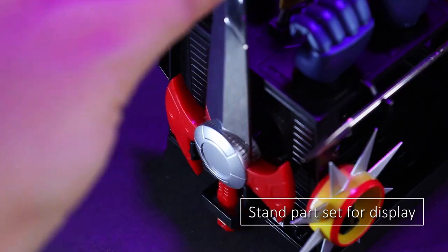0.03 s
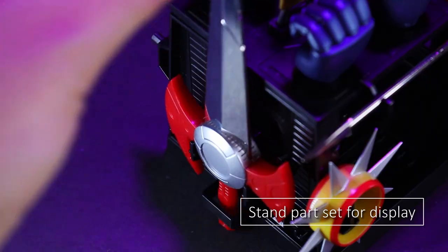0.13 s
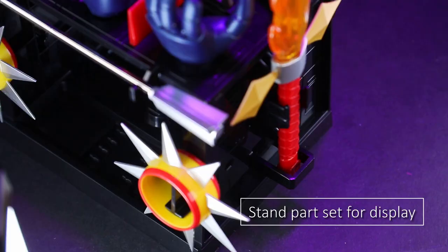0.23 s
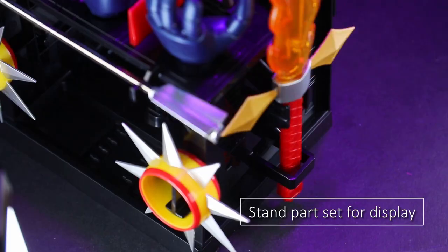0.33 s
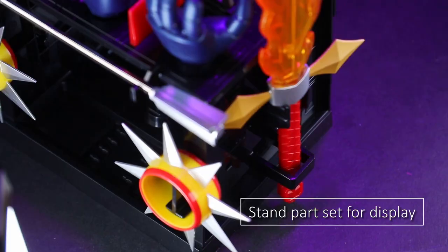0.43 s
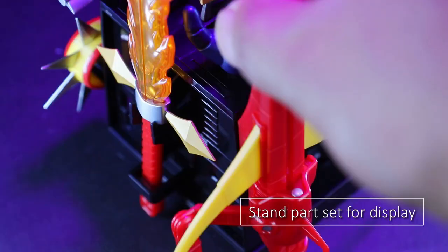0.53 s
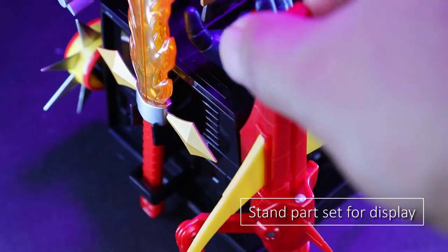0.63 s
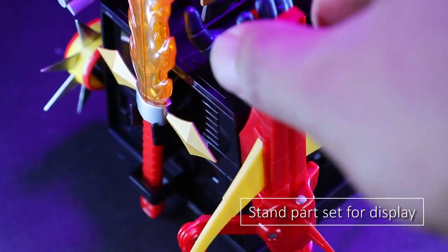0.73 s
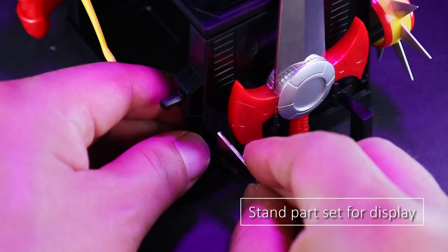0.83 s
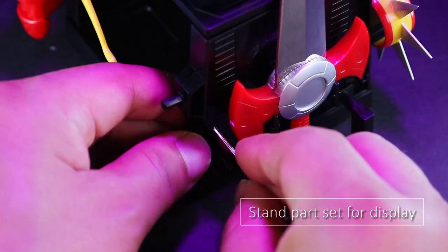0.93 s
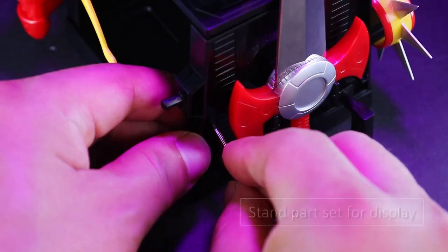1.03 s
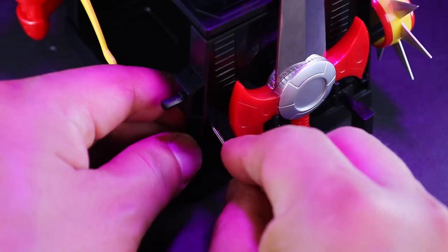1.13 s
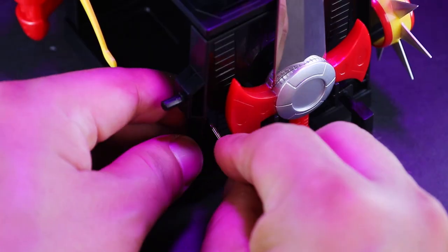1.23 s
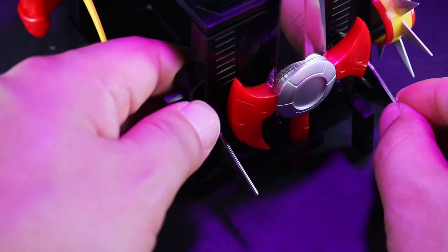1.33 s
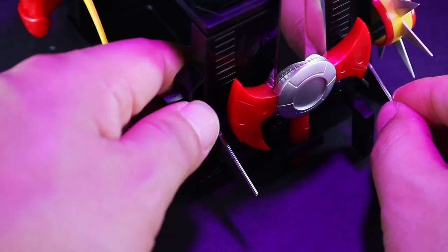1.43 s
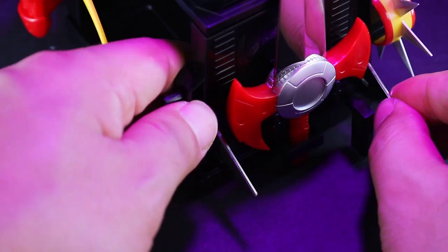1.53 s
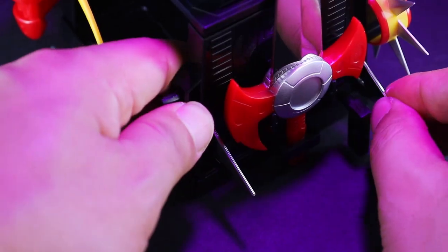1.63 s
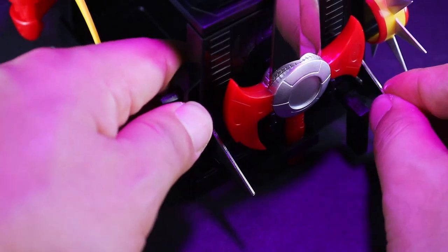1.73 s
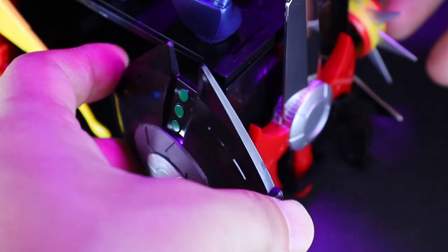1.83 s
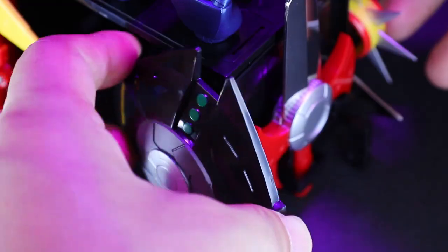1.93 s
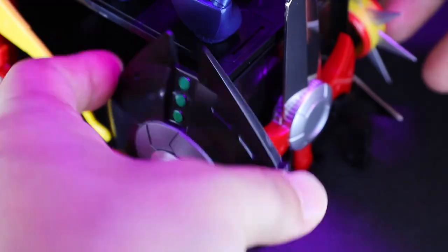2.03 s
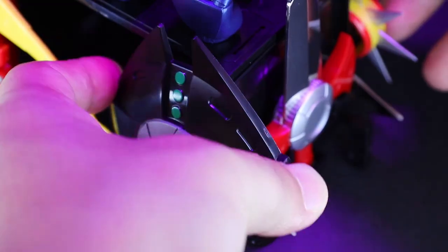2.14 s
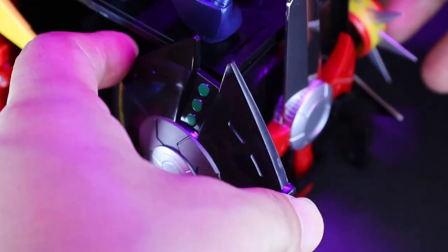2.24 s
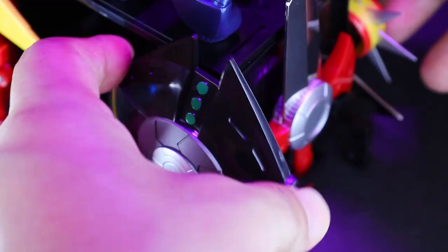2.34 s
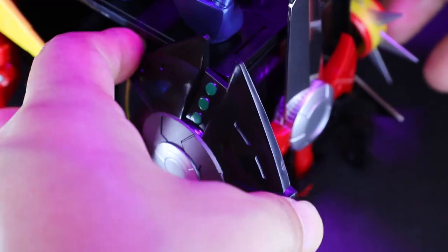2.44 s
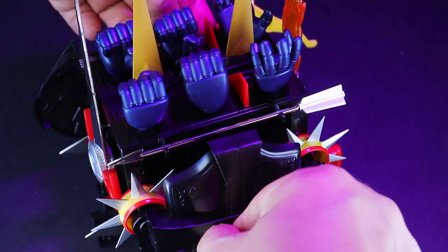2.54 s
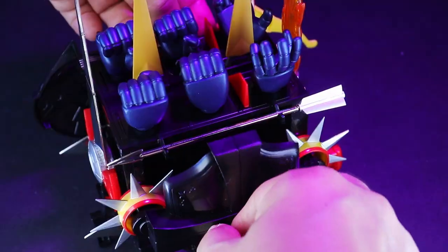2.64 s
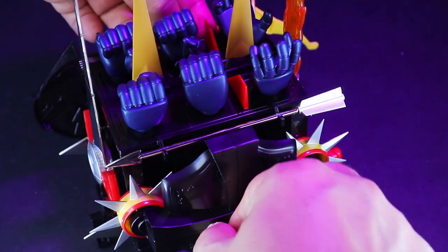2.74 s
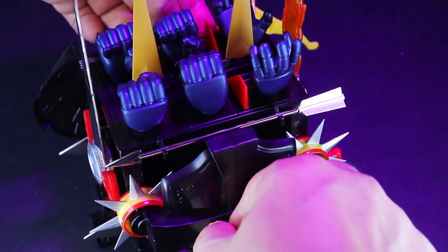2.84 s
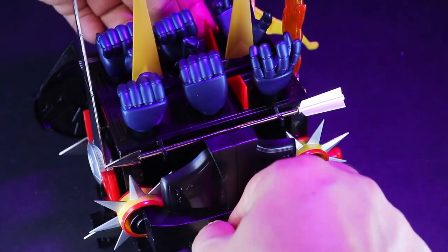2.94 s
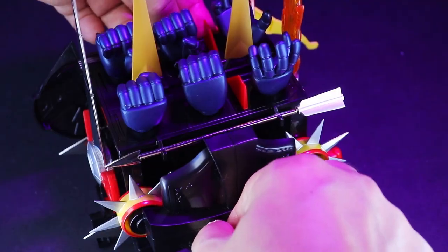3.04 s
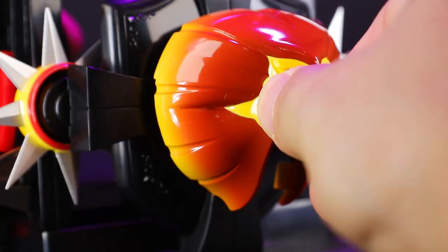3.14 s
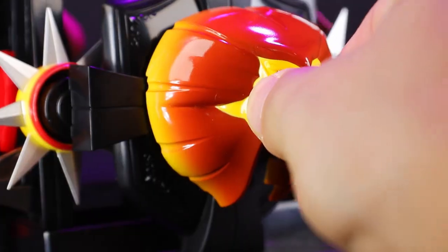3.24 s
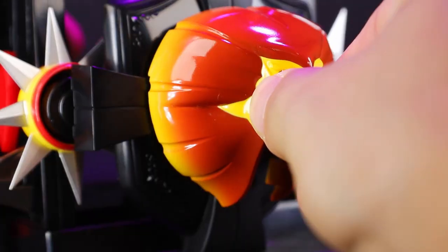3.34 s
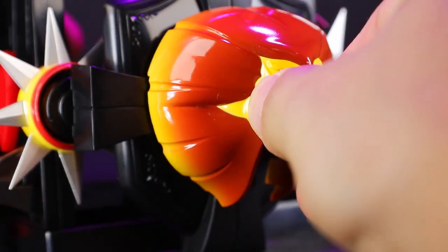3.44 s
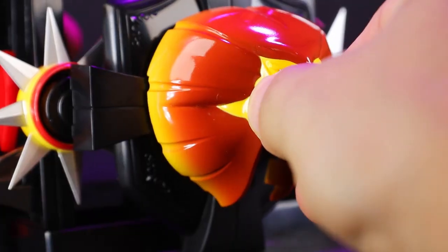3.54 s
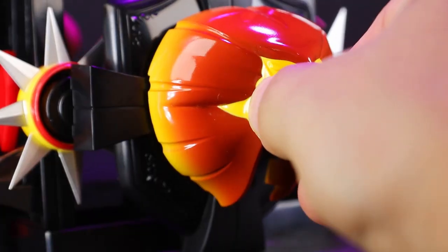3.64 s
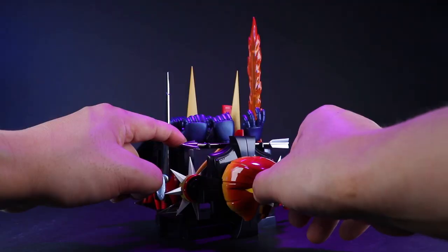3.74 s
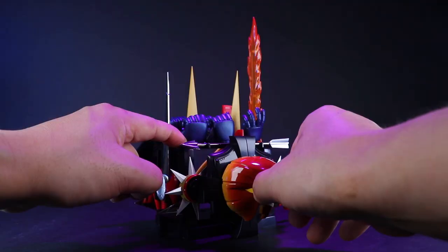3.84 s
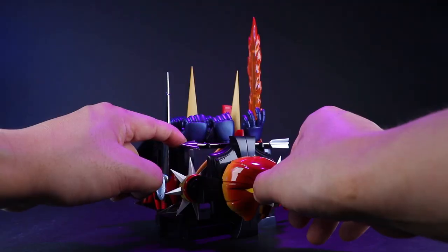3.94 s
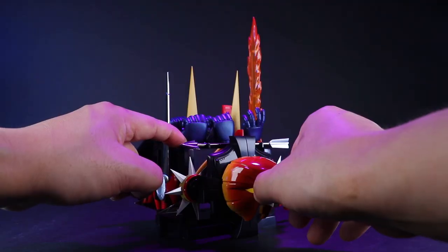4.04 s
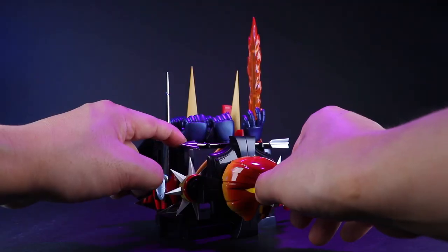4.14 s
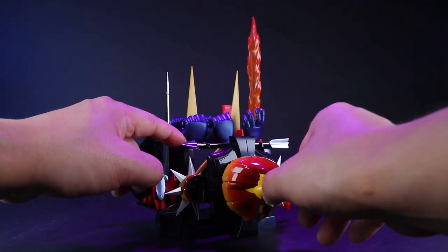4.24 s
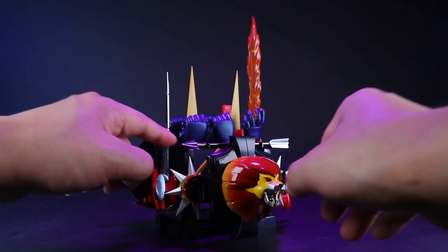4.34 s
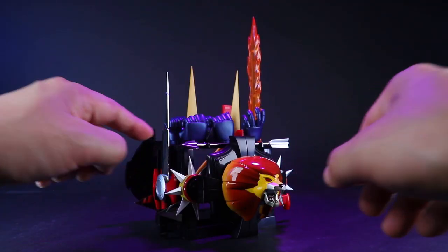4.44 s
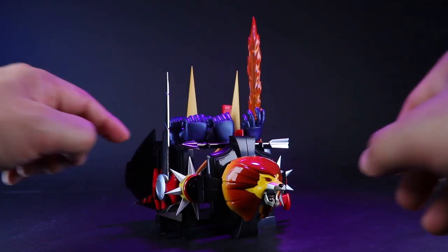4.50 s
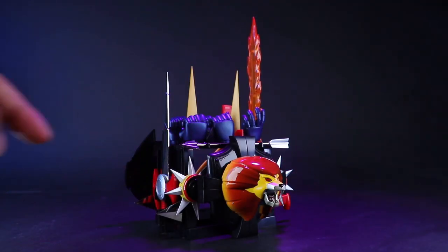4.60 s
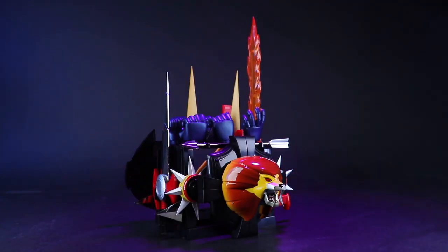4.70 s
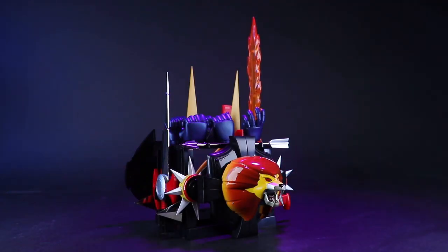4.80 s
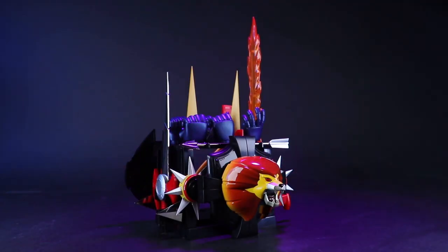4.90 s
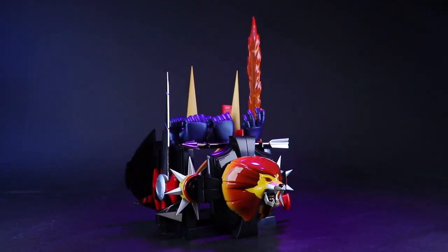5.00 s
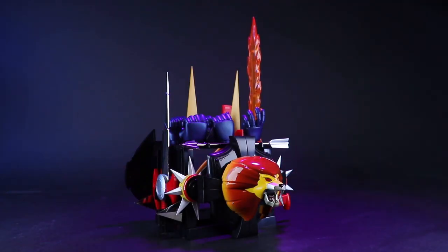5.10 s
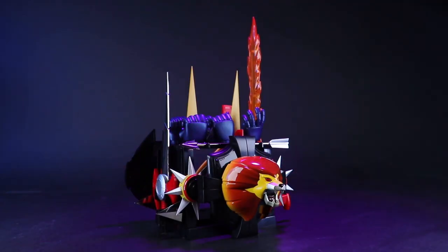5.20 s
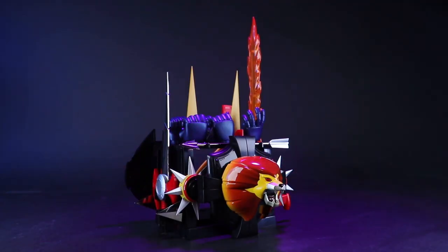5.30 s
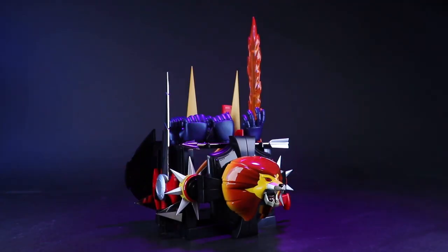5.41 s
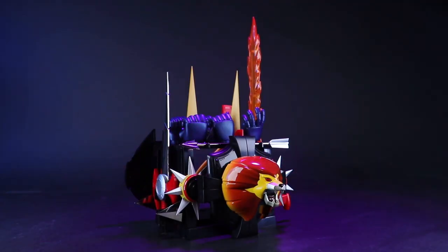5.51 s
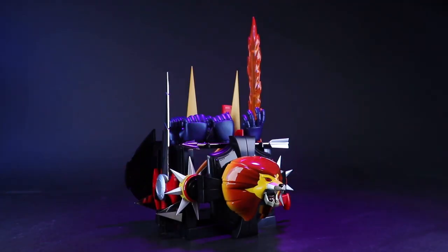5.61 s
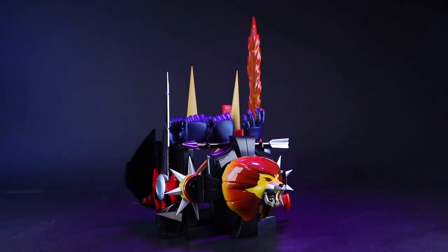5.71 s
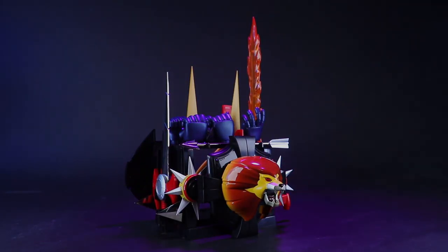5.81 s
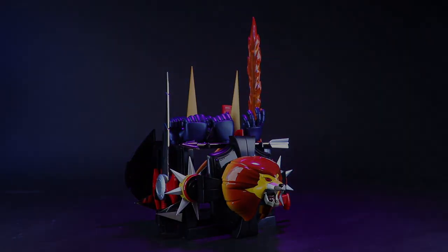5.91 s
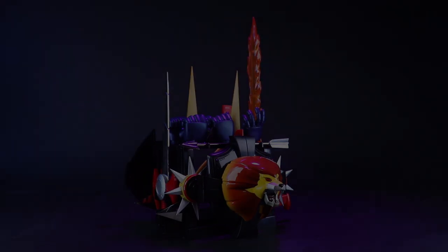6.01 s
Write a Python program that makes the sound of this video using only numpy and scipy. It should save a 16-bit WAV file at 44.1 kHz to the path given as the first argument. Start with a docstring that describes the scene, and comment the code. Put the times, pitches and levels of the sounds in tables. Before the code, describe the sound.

Small plastic toy parts click, scrape and snap onto a hollow stand close by, with one brief metallic ping near the end.

```python
"""Toy parts snapped onto a display stand

Small room, microphone close to a hollow plastic stand as plastic and metal parts are pressed onto it.
Pegs scrape, tick and snap home; each part rings briefly at its own pitch and shakes the stand.
The hardest snaps overload the microphone. Behind it all lie room tone and a thin electrical whine."""
import sys
import numpy as np
from scipy import signal
from scipy.fft import rfft, irfft
from scipy.io import wavfile

SR = 44100
rng = np.random.default_rng(int(sys.argv[2]) if len(sys.argv) > 2 else 0)


def wav_record(signal):
    """Record a signal, one row per channel, as 16-bit PCM in the file named by sys.argv[1]."""
    frames = np.transpose(np.atleast_2d(signal))
    bounded = np.clip(frames, -1, 1)
    # unit amplitude maps onto the largest positive 16-bit level
    quanta = np.round(bounded * 32767).astype(np.int16)
    wavfile.write(sys.argv[1], SR, quanta)


N = 267231

# pegs that catch, then seat: t/s, level/dB, treble/dB, seating delay/s, seating re catch/dB, part
PEG_SNAPS = [ (.094, -45, -16, .008, 7.5, "sword"), (.402, -17, 0.5, 0.0058, 4.5, "sword"),
             (.463, -25, -1.5, .007, 4, "sword"), (.788, -25.5, -4.5, .005, -13.5, "blade"),
             (1.333, -34.5, -7, .010, -6.5, "rod"), (1.940, -35.5, -14, 0.0096, -16, "shield"),
             (3.109, -19, -3.5, .002, -7.5, "armour"), (3.308, -7, -2.5, 0.0068, -3.5, "helmet"),
             (3.566, -44.5, 2.5, .008, 6, "helmet")]
# parts knocking against the stand: t/s, level/dB, treble/dB, part
PART_KNOCKS = [ (.000, -37.5, -34, "sword"), (0.37, -36, -19, "sword"), (1.299, -39.5, -15, "rod"),
               (2.752, -40.5, 1.5, "armour"), (2.816, -42, 2, "armour"), (2.846, -32, -7, "armour"),
               (2.887, -33, -17, "armour"), (3.014, -38, -1.5, "armour"), (3.044, -42, -16, "armour"),
               (3.225, -30, -3.5, "armour"), (3.456, -36, -11, "helmet"), (3.575, -36, -5, "spike"),
               (3.720, -50, -32, "helmet")]
# the shield's joint turning notch by notch: t/s, level/dB
JOINT_NOTCHES = [(2.007, -42), (2.072, -42.5), (2.124, -41.5), (2.263, -40.5), (2.309, -46)]
# small hard edges touching: t/s, level/dB, treble/dB, ring f/Hz, crack t60/s
EDGE_TICKS = [(0.294, -45.5, -14, 2250, .028), (0.945, -47, -5, 1140, 0.033),
              (1.116, -43, -12, 1060, 0.027), (1.64, -44, -1, 4570, 0.024), (3.605, -43, -3, 1190, 0.021),
              (4.276, -51, -5, 1870, 0.036), (4.399, -57.5, 7, 1010, .04), (5.187, -39.5, 3, 3280, .18),
              (5.764, -71.5, 18, 9000, 0.028), (5.915, -63, 15.5, 6060, 0.032),
              (5.972, -49.5, -1.5, 3650, 0.0073)]
# parts sliding and fingers rubbing: t/s, length/s, level/dB, bass/dB, treble/dB
SURFACE_RUBS = [(0.729, 0.038, -40, -7.5, -4), (1.69, 0.049, -48.5, 2.5, -35),
                (2.142, 0.083, -61.5, -3, -0.5), (2.621, 0.065, -44.5, 0.5, -11.5),
                (2.748, 0.037, -35.5, -2, -8), (2.772, 0.17, -40.5, 3.5, -28),
                (2.991, 0.073, -47, 8, -32.5), (3.233, 0.29, -46, -0.5, -5),
                (3.389, 0.057, -31, -13.5, -10), (3.452, 0.049, -33, -1.5, -16)]
# modes, by part: f/Hz, level re crack/dB, t60/s
PART_MODES = { "sword": [(582, -6, 0.067), (764.5, -2, .09), (856, -5, 0.018), (1621, -9, 0.11),
              (6280, -5, 0.0058), (8220, -2, .09), (8830, -11, 0.11)], "blade": [(918, 12.5, 0.02),
              (1000, -6, 0.022), (2894, -11, .07), (3700, -13, .03)], "rod": [(1040, 5, 0.02),
              (1258, 8, 0.025), (1323, 5, 0.066), (1523, -4, 0.013)], "shield": [(637.4, -2.5, 0.016),
              (915, 1.5, 0.02), (1460, -9, 0.02), (2460, -12, .04)], "armour": [(1243, 0.5, 0.022),
              (1740, -12.5, .04), (3580, -13, .05)], "helmet": [(1254, 0, .025), (1420, -4, 0.03),
              (1677, -3.5, 0.035), (1825, -9.5, .018), (2778, -13, 0.024)], "spike": [(8680, -3, .22),
              (5950, -1, 0.012)]}
# crack of a firm contact, by part: bass/dB, t60/s
PART_CRACKS = {"sword": (-2.5, 0.048), "blade": (-0.53, 0.034), "rod": (-6, 0.02), "shield": (-9, .022),
               "armour": (-4.5, .026), "helmet": (-5, 0.039), "spike": (-10, 0.035)}
# colour of a plastic contact: f/Hz, spectral density/dB
PLASTIC_SPECTRUM = [(60, -10.5), (150, -4), (260, -5.5), (420, 8.5), (700, -1), (1200, -3.5), (2000, -7.5),
                    (3600, -2.5), (5000, -10.5), (7000, -4), (9000, -7), (12000, -13), (15500, -23.5)]
# modes of the stand and the parts on it: f/Hz, gain/dB, t60/s
STAND_MODES = [(394, 8, .17), (425, 3, .15), (496, 3, .2), (566, 2, .16), (748, 1, .14), (900, -4, .07),
               (1230, -3, .09), (1661, -5, .1), (2515, -2, .05), (2820, -4, .05), (3700, 0, .05),
               (8220, -7, .07), (8870, -8, .07)]
# the stand nudged against the table: t/s, length/s, level/dB, centre f/Hz
TABLE_BUMPS = [(2.328, 0.037, -50.5, 255), (2.618, 0.13, -50.5, 280), (3.305, 0.023, -34.5, 58),
               (3.362, 0.2, -47.5, 224), (3.821, 0.067, -45, 171), (3.901, 0.17, -58, 202),
               (4.182, 0.16, -48, 134), (4.697, .07, -58.5, 221.6), (5.186, 0.041, -51, 260)]
# reverberation of the small room: f/Hz, t60/s, level/dB
ROOM_DECAY = [(100, 0.61, -6), (398, 0.23, -6), (1200, 0.24, -7), (3500, 0.29, -8.5), (7860, 0.2, -6),
              (14000, .16, -9)]
# room tone: f/Hz, relative spectral density/dB
ROOM_TONE_SPECTRUM = [(15, -34), (30, -1), (90, -7), (170, -4.5), (300, -4.5), (570, -6.5), (660, -12.5),
                      (800, -11.5), (1400, -13), (2100, -18.5), (4800, -25.5), (8800, -21.5), (13000, -26),
                      (15500, -34.5)]
# level of the electrical whine over time: t/s, level before its gain/dB
WHINE_LEVELS = [(0.0, -62), (0.52, -59), (0.84, -61), (1.2, -57.5), (2.05, -65), (2.46, -57), (2.59, -70.5),
                (3.3, -67), (6.05, -59)]

EDGES = np.concatenate([[50, 170], np.geomspace(330, 17000, 15)])  # noise band edges, f/Hz
CENTRES = np.sqrt(EDGES[1:] * EDGES[:-1])
BANDS = [signal.butter(2, pair, "bandpass", fs=SR, output="sos") for pair in zip(EDGES[:-1], EDGES[1:])]
T = np.arange(SR // 3) / SR  # time within one short sound, t/s


def snaps(hard_db=-18.5, seat_treble_db=-7, rattle_db=-15):
    """A peg catches, then seats with a duller click; after a hard snap the loose parts rattle."""
    out = np.zeros(N)
    for s, db, treble_db, lag, seat_db, part in PEG_SNAPS:
        add(out, s, contact(part, db, treble_db))
        add(out, s + lag, contact(part, db + seat_db, treble_db + seat_treble_db))
        if db > hard_db:
            rattle = chatter(.07, db + seat_db + rattle_db, bass_db=-7, treble_db=-5.5, fall_db=8)
            add(out, s + lag, rattle)
    return out


def contact(part, db, treble_db, firm_db=-31, bass_per_db=-0.2758):
    """A crack, a shove to the stand and the part's own short ring; a softer contact has more bass."""
    bass_db, crack_t60 = PART_CRACKS[part]
    bass_db += bass_per_db * (db - firm_db)
    tilt = [(1500, 0), (6000, treble_db)]  # f/Hz, gain/dB
    ring = sum(undb(mode_db + at(hz, tilt)) * mode(hz, t60) for hz, mode_db, t60 in PART_MODES[part])
    shove = undb(bass_db - 6.5) * mode(hz=443.6, t60=.014)
    return at_level(db, crack(crack_t60, bass_db, treble_db) + shove + ring)


def crack(t60, bass_db, treble_db, damping=.15, rise_s=.0016):
    """The noise burst of a contact, which dies sooner in the treble; t60 holds at 1500 Hz."""
    rise = 1 - np.exp(-T / rise_s)
    envelopes = [rise * fade(t60 * (1500 / hz) ** damping) for hz in CENTRES]
    return plastic(envelopes, bass_db, treble_db)


def plastic(envelopes, bass_db, treble_db):
    """Crowded, well-damped modes of a moulded part: noise with one envelope a band."""
    tilt = [(480, bass_db), (900, 0), (1700, 0), (6000, treble_db)]  # f/Hz, gain/dB
    gains = undb(at(CENTRES, PLASTIC_SPECTRUM) + at(CENTRES, tilt)) * np.sqrt(np.diff(EDGES) / 1400)
    bursts = [envelope * rng.standard_normal(len(T)) for envelope in envelopes]
    return sum(gain * unit(signal.sosfilt(band, burst)) for band, gain, burst in zip(BANDS, gains, bursts))


def mode(hz, t60, rise_s=0.0026):
    """One resonance that builds quickly and decays."""
    rise = 1 - np.exp(-T / rise_s)
    return unit(rise * fade(t60) * np.sin(2 * np.pi * hz * T))


def knocks():
    """Single contacts: parts feeling for their sockets, and the notches of a stiff joint."""
    out = np.zeros(N)
    for s, db, treble_db, part in PART_KNOCKS:
        add(out, s, contact(part, db, treble_db))
    for s, db in JOINT_NOTCHES:
        add(out, s, contact("shield", db, treble_db=-20.5))
    return out


def ticks(touches=7, handling_s=(1.7, 4.4), touch_db=-52.5, spread_db=4.5):
    """Hard edges give thin cracks with one brief pitch each; the fingers add faint chance touches."""
    out = np.zeros(N)
    for s, db, treble_db, hz, t60 in EDGE_TICKS:
        rise_s = 0.092 * t60  # a tick that drags on also starts more softly
        ring = undb(-1.5) * mode(hz, t60=0.011, rise_s=rise_s)
        burst = crack(t60, bass_db=-22, treble_db=treble_db, damping=.3, rise_s=rise_s)
        add(out, s, at_level(db, burst + ring))
    for s in rng.uniform(*handling_s, touches):
        add(out, s, contact("shield", rng.normal(touch_db, spread_db), treble_db=-13))
    return out


def rubs():
    """Parts scrape along their sockets and under the fingers."""
    out = np.zeros(N)
    for s, length, db, bass_db, treble_db in SURFACE_RUBS:
        add(out, s, chatter(length, db, bass_db, treble_db))
    return out


def chatter(length, db, bass_db, treble_db, fall_db=3, slip_db=5, slip_samples=90):
    """Surfaces stick and slip in uneven little steps that swell and die away."""
    steps = undb(slip_db * rng.standard_normal(len(T) // slip_samples + 1))
    slips = np.repeat(steps, slip_samples)[:len(T)]
    along = np.minimum(T / length, 1)
    pressure = np.sqrt(np.abs(np.sin(np.pi * along))) * undb(-fall_db * along)
    return at_level(db, plastic([pressure * slips] * len(BANDS), bass_db, treble_db), length)


def stand(contacts):
    """The hollow stand rings in sympathy with every contact."""
    out = np.zeros(N)
    for hz, db, t60 in STAND_MODES:
        pole = np.exp((2j * np.pi * hz - np.log(1000) / t60) / SR)
        out += undb(db) * 2 * (1 - abs(pole)) * signal.lfilter([1], [1, -pole], contacts).imag
    return out


def bumps(edge_ratio=2.6):
    """Dull shudders as the base shifts on the table under the hands."""
    out = np.zeros(N)
    for s, length, db, hz in TABLE_BUMPS:
        push = np.sin(np.pi * np.minimum(T / length, 1)) * rng.standard_normal(len(T))
        band = signal.butter(2, [hz / edge_ratio, hz * edge_ratio], "bandpass", fs=SR, output="sos")
        add(out, s, at_level(db, unit(signal.sosfilt(band, push)), length))
    return out


def room(toy, echo_s=0.0072, echo_db=-11, build_s=0.0043):
    """One early echo off a nearby surface reaches the microphone, with the room's short diffuse tail."""
    build = 1 - np.exp(-(T / build_s) ** 2)
    response = np.zeros(len(T))
    for band, hz, width in zip(BANDS, CENTRES, np.diff(EDGES)):
        tail = signal.sosfilt(band, rng.standard_normal(len(T))) * build * fade(at(hz, ROOM_DECAY))
        response += unit(tail) * undb(at(hz, ROOM_DECAY, column=2)) * np.sqrt(2 * width / SR)
    response[int(echo_s * SR)] += undb(echo_db)
    return signal.fftconvolve(toy, response)[:N]


def room_tone(db=-52, top_hz=15577):
    """The room's steady noise floor, strongest in the bass."""
    hz = np.maximum(np.arange(N // 2 + 1) * SR / N, 1)
    spectrum = rfft(rng.standard_normal(N)) * undb(at(hz, ROOM_TONE_SPECTRUM)) * (hz < top_hz)
    return at_level(db, unit(irfft(spectrum, N)), N / SR)


def whine(hz=15577, gain_db=2):
    """A thin electrical tone in the background; its level steps up and down at times."""
    t = np.arange(N) / SR
    rms = undb(gain_db + np.interp(t, *np.transpose(WHINE_LEVELS)))
    return np.sqrt(2) * rms * np.sin(2 * np.pi * hz * t)


def undb(db):
    """Decibels to gain."""
    return 10 ** (np.asarray(db) / 20)


def unit(x):
    """Scale to an energy of one."""
    return x / np.sqrt(np.sum(x ** 2) + 1e-18)


def at_level(db, sound, span_s=.01):
    """Apply the gain that gives an energy of one an RMS level of db over span_s."""
    return undb(db) * np.sqrt(span_s * SR) * sound


def at(hz, table, column=1):
    """Read one column of a table on a log-frequency axis."""
    rows = np.array(table, float)
    return np.interp(np.log(hz), np.log(rows[:, 0]), rows[:, column])


def fade(t60):
    """Exponential decay, 60 dB down after t60 seconds."""
    return np.exp(-np.log(1000) * T / t60)


def add(track, s, sound):
    """Mix a sound into a track at time s."""
    start = max(int(s * SR), 0)
    track[start:start + len(sound)] += sound[:N - start]


def scene():
    """Contacts, the stand's ring and its bumps on the table, close up in mono with the room behind."""
    contacts = snaps() + knocks() + ticks() + rubs()
    toy = contacts + stand(contacts) + bumps()
    return (toy + room(toy) + room_tone() + whine())[None]


def record(dry, top_hz=16000):
    """At this distance the hardest snaps clip the microphone; the top is cut steeply."""
    lowpass = signal.ellip(8, .2, 70, top_hz, fs=SR, output="sos")
    return signal.sosfilt(lowpass, np.clip(dry, -1, 1))


dry = scene()
out = record(dry)
wav_record(out)
```